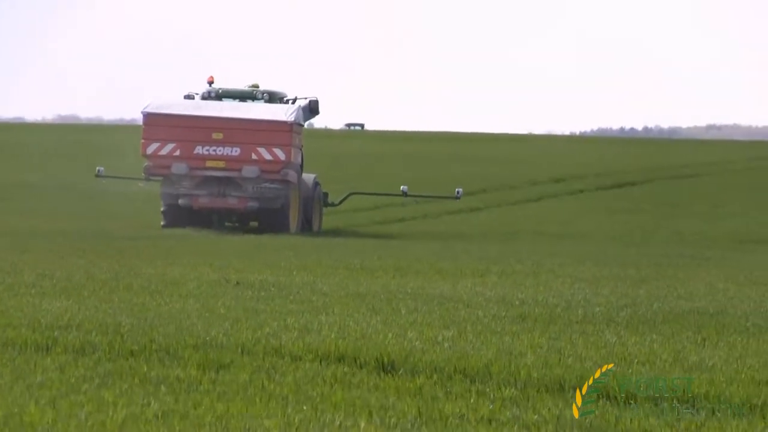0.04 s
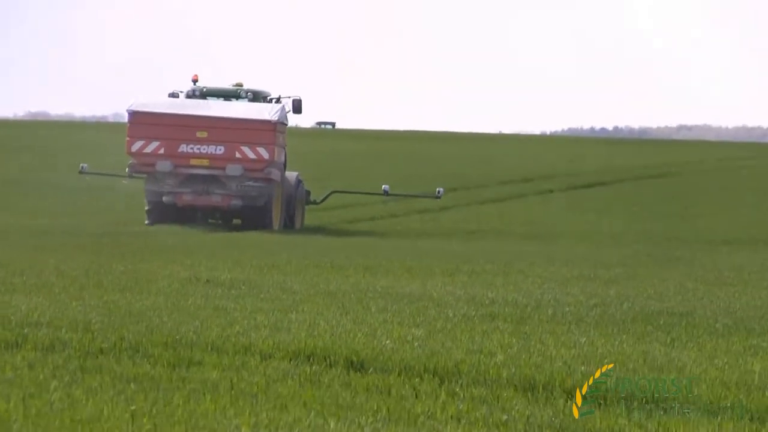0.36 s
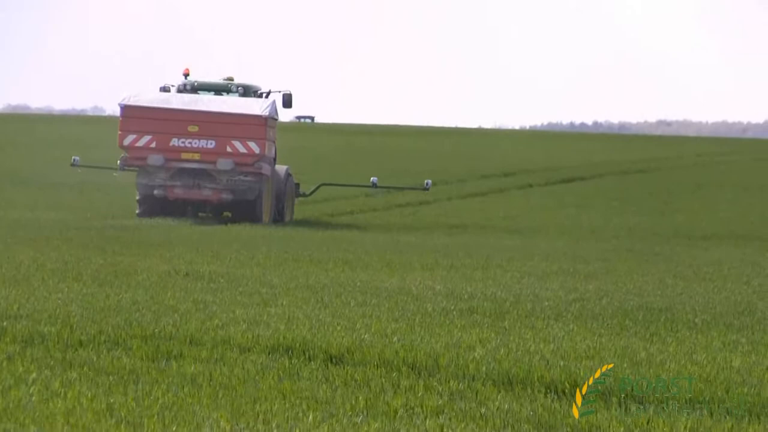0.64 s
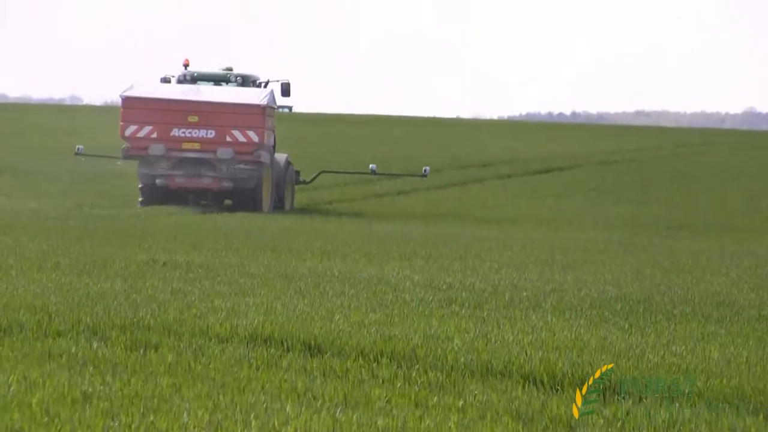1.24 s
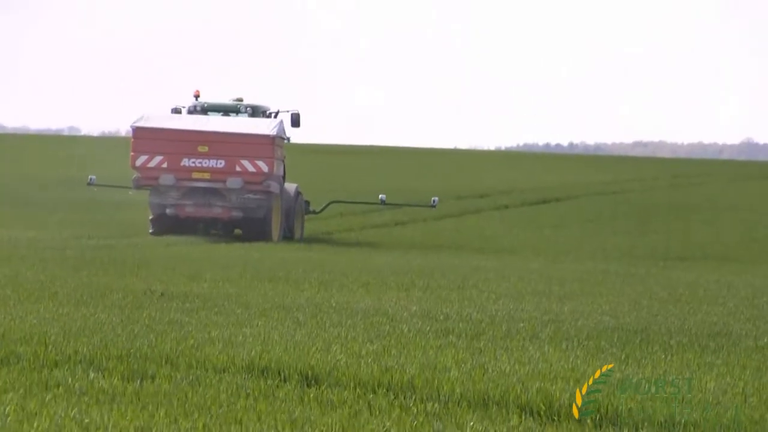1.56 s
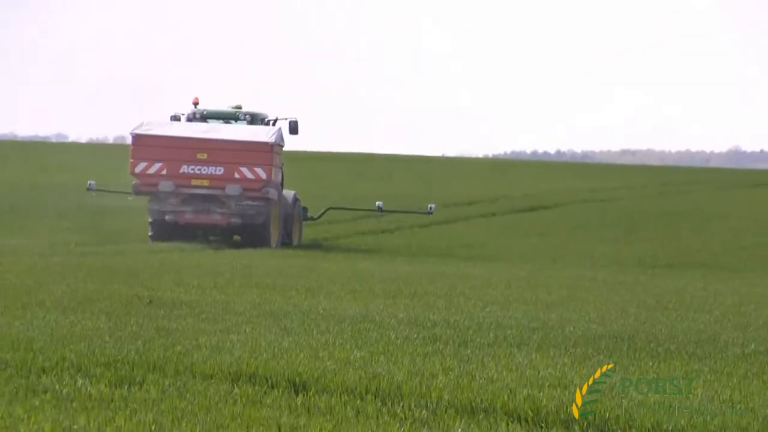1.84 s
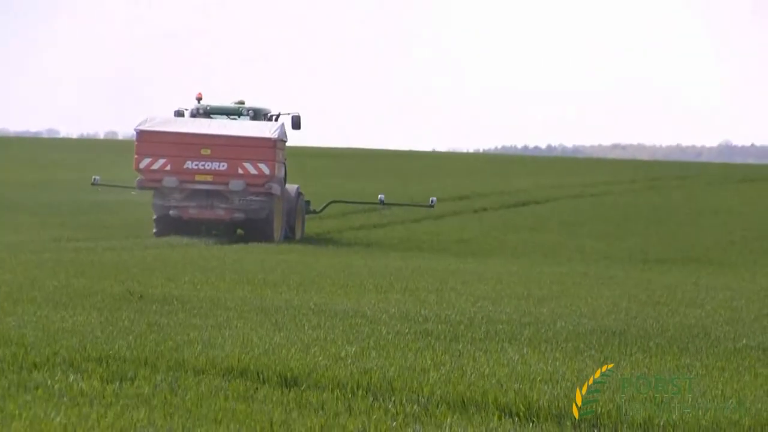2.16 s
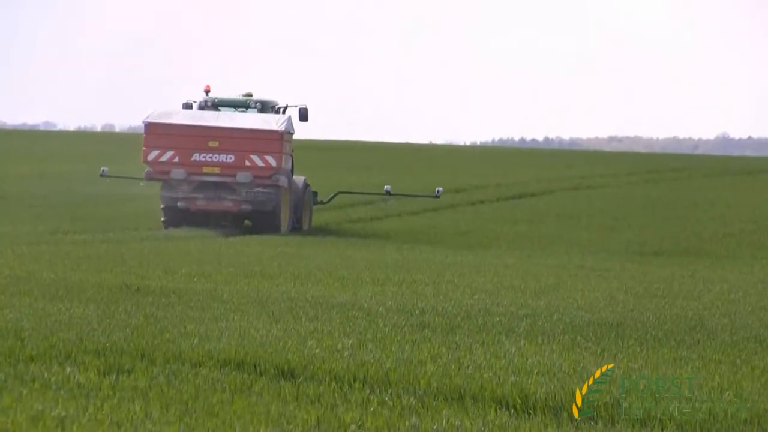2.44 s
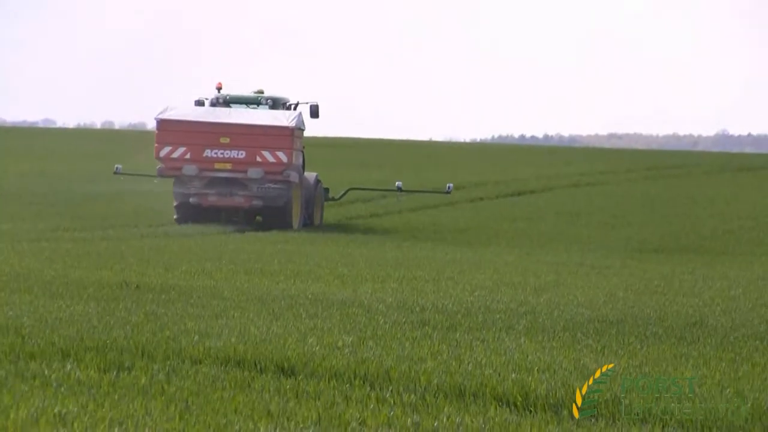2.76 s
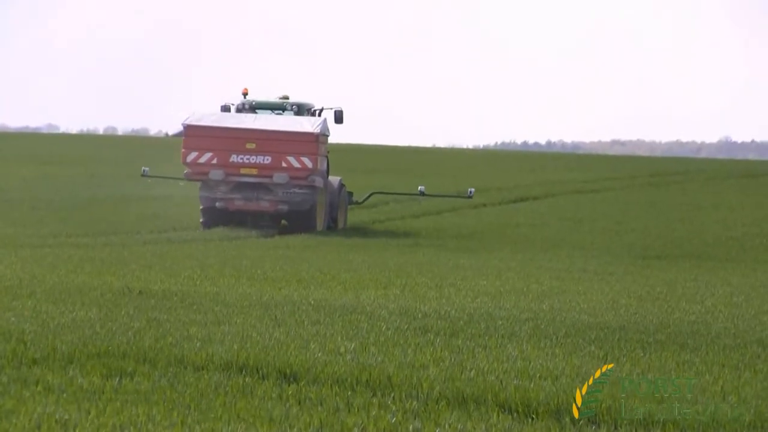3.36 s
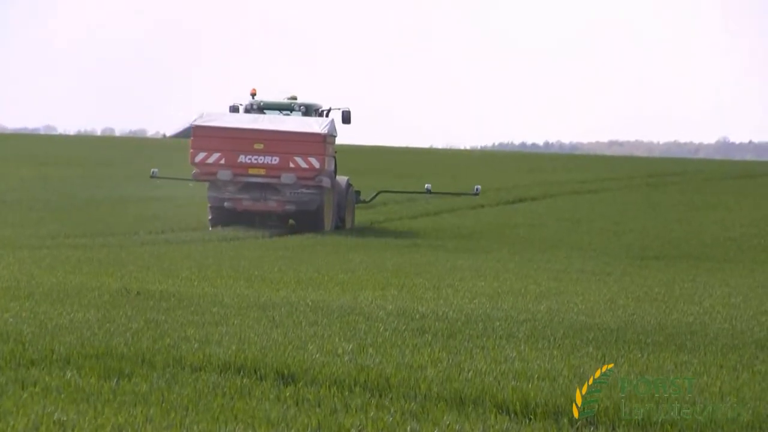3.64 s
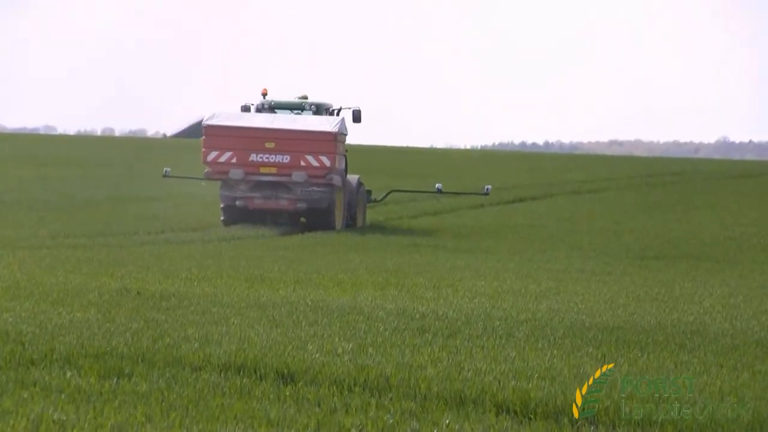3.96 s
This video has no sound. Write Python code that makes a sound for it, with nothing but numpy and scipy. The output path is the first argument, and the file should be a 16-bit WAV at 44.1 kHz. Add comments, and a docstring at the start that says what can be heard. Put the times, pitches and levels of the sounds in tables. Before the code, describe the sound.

Steady drone of a faraway tractor pulling a fertilizer spreader, with gusts rumbling on the microphone.

```python
"""A distant six-cylinder tractor pulls a fertilizer spreader: firing hum, rasp-edged machinery roar and
thin gear whine, with spreader and crop hissing above and wind rumbling on the microphone. The roar
swells at 0.8 s; a run of buffets follows at 1.1-1.7 s. A dip rises through the roar, deepest at 2.4 s.
The whine peaks at 3 s, the roar swells again, and a second run of buffets starts at 3.7 s.
Throughout, moving air shifts the roar's colour and the hum fades as the tractor draws away."""
import sys
import numpy as np
from scipy import signal
from scipy.fft import rfft, irfft
from scipy.io import wavfile
from scipy.ndimage import uniform_filter1d, map_coordinates

SR = 44100
rng = np.random.default_rng(int(sys.argv[2]) if len(sys.argv) > 2 else 0)


def digitize_waveform(pressure):
    """Quantize a signal to 16-bit integers and store it at the path in sys.argv[1].

    Rows of a 2-D input are taken as channels; values are limited to [-1, 1].
    """
    field = np.atleast_2d(pressure).T
    bounded = np.clip(field, -1, 1)
    quanta = np.round(bounded * 32767).astype(np.int16)
    wavfile.write(sys.argv[1], SR, quanta)


N = 176400


def undb(db):
    """Decibels to gain."""
    return 10 ** (np.asarray(db) / 20)


def unit(x):
    """Scale to rms 1."""
    return x / np.std(x)


def noise():
    """White noise."""
    return rng.standard_normal(N)


def bins_hz():
    """FFT bin frequencies, floored at 1 Hz."""
    return np.maximum(np.arange(N // 2 + 1) * SR / N, 1)


def curve(rows, column=1):
    """Table column, linearly interpolated in time."""
    rows = np.array(rows)
    return np.interp(np.arange(N) / SR, rows[:, 0], rows[:, column])


def walk(rate_hz):
    """Smooth random drift, spread near 1."""
    hold = max(int(SR / rate_hz), 2)
    steps = np.repeat(rng.standard_normal(N // hold + 1), hold)
    return 1.3 * uniform_filter1d(uniform_filter1d(steps, hold), hold)[:N]


def phase_rad(hz):
    """Phase of a moving frequency, random start."""
    return 2 * np.pi * (np.cumsum(hz) / SR + rng.random())


def narrowband(phase, width_hz):
    """Noise band about a moving tone, rms near 1."""
    return walk(width_hz) * np.sin(phase) + walk(width_hz) * np.cos(phase)


def coloured_noise(colour):
    """Noise shaped by (f/Hz, gain/dB) rows, rolled off beyond their ends; rms 1."""
    hz, db = np.array(colour).T
    f = bins_hz()
    skirts = np.minimum(f / hz[0], 1) ** 2 * np.minimum(hz[-1] / f, 1) ** 2
    gain = undb(np.interp(np.log(f), np.log(hz), db))
    return unit(irfft(rfft(noise()) * gain * skirts, N))


def flicker(x, lo_hz, hi_hz, depth_db, rate_hz, bands, tilt_db_per_oct=0):
    """Overlapping bands waver independently and tilt about the middle."""
    octave, spectrum, out = np.log2(bins_hz()), rfft(x), 0
    centres = np.linspace(np.log2(lo_hz), np.log2(hi_hz), bands)
    for centre, weights in zip(centres, np.eye(bands)):
        band = irfft(spectrum * np.interp(octave, centres, weights), N)
        out += band * undb(depth_db * walk(rate_hz) + tilt_db_per_oct * (centre - centres.mean()))
    return out


def breezy_noise(colour, levels, trim_db=0):
    """Enveloped noise whose bands waver in the breeze."""
    wavering = flicker(coloured_noise(colour), 1500, 6900, depth_db=0.9, rate_hz=7.05, bands=7)
    return wavering * undb(curve(levels) + trim_db)


def stereo(mid, side, width):
    """Mid/side to left/right."""
    return mid + width * side * np.array([[1], [-1]])


def mic_ports(x, lag_s):
    """A slow pressure wave meets one microphone port lag_s before the other."""
    return stereo(x, np.gradient(x) * SR, lag_s / 2)


# Background spectra, mid and side: f/Hz, gain/dB
AIR_MID_COLOUR = [(1500, -7), (3000, 5.5), (6000, 0), (9000, -0.5), (12000, -2.5), (15500, -6)]
AIR_SIDE_COLOUR = [(2000, -36), (2700, -22), (3200, 0), (5200, 0.5), (7500, -1.5), (9500, -0.5),
                   (12000, -3.5), (15500, -8)]
def air(mid_db=-63, side_db=-59.5):
    """Even, wide background hiss."""
    mid = undb(mid_db) * coloured_noise(AIR_MID_COLOUR)
    return stereo(mid, coloured_noise(AIR_SIDE_COLOUR), undb(side_db))


# Rumble envelope: t/s, level/dB
WIND_LEVEL = [(0, -41.5), (.55, -42.5), (.65, -33.5), (.75, -39), (.87, -38.5), (1.05, -42), (1.25, -36),
              (1.45, -36), (1.6, -32), (1.7, -38), (1.83, -37.5), (1.97, -40.5), (2.55, -40), (2.7, -48),
              (3.2, -41.5), (3.6, -44), (3.78, -33), (3.9, -31.5), (4, -28)]
# Rumble spectrum: f/Hz, gain/dB
WIND_COLOUR = [(10, -20), (25, -4), (55, 0), (100, -4.5), (150, -7), (220, -15.5), (320, -21), (600, -27),
               (1200, -67)]
def wind():
    """Turbulence on the microphone, brighter when stronger."""
    level_db = curve(WIND_LEVEL)
    tilt = 0.12 * (level_db - level_db.mean())
    rumble = coloured_noise(WIND_COLOUR)
    rumble = flicker(rumble, 38.6, 323, depth_db=3.5, rate_hz=24.88, bands=4, tilt_db_per_oct=tilt)
    return rumble * undb(level_db)


# Eddies: t/s, level/dB, f/Hz, decay/s
BUFFETS = [(0.642, -22.5, 76.4, 0.014), (0.661, -25, 170, 0.0065), (1.141, -28, 140, 0.0044),
           (1.281, -19.5, 140.3, 0.0031), (1.33, -27, 290, .004), (1.346, -23.5, 149, 0.0061),
           (1.37, -29, 450, 0.0035), (1.373, -18, 100, 0.0036), (1.441, -27.5, 170.4, 0.0052),
           (1.521, -17.5, 100, 0.0076), (1.533, -16.5, 120.5, 0.005), (1.537, -16.5, 363, 0.0036),
           (1.57, -16, 100, 0.004), (1.583, -18, 214.7, 0.005), (1.614, -19.5, 114.7, 0.0064),
           (1.648, -19.5, 64.9, 0.0079), (2.825, -31.5, 163, 0.0094), (3.326, -30.5, 230.4, 0.0057),
           (3.752, -13, 70, 0.0077), (3.748, -19.5, 230, 0.0073), (3.864, -9.5, 205, 0.006),
           (3.873, -19.5, 390, 0.0043), (3.887, -17.5, 220.5, 0.0056), (3.906, -12, 105, 0.005),
           (3.944, -25, 238.2, 0.0043), (3.951, -17, 190, 0.0027), (3.964, -15, 145.3, 0.004),
           (3.96, -21.5, 370, 0.0034)]
def buffets(rise_speedup=1.38, steepening=0.097):
    """Each eddy shoves the diaphragm through one or two steep, ragged swings."""
    t, out = np.arange(N) / SR, np.zeros(N)
    ragged_rad_per_hz = phase_rad(np.exp(0.17 * walk(500)))
    grit = 1 + 0.18 * walk(400)
    for (at_s, db, hz, decay_s), start in zip(BUFFETS, rng.random(len(BUFFETS))):
        near = np.abs(t - at_s) < 10 * decay_s
        phase = hz * ragged_rad_per_hz[near] + 2 * np.pi * start
        age = (t[near] - at_s) / decay_s
        envelope = undb(db) / np.cosh(np.pi / 2 * np.minimum(age, rise_speedup * age))
        out[near] += envelope * (np.sin(phase) + steepening * np.sin(2 * phase))
    return out * grit


# Hiss layer envelopes, before trim: t/s, level/dB
TREBLE_LEVEL = [(.03, -53), (.35, -52.5), (.5, -51.5), (.7, -54), (.95, -52.7), (1.3, -54), (1.8, -54),
                (2.2, -55), (2.38, -54), (2.6, -55), (3, -53), (3.23, -52.7), (3.42, -54.5), (3.66, -58),
                (3.97, -55)]
HISS_LEVEL = [(.03, -58), (.27, -56), (.58, -57.5), (.8, -61), (1.4, -60.5), (2, -61.5), (2.25, -60.5),
              (2.85, -61.5), (3.15, -56), (3.46, -64), (3.8, -59.5), (3.97, -58.5)]
SIZZLE_LEVEL = [(0, -62), (.24, -59.5), (.42, -64), (.8, -64), (1, -62), (1.3, -69.5), (1.8, -63.5),
                (2.1, -69), (2.7, -64), (2.9, -68.5), (3.14, -63.5), (3.44, -69), (3.79, -61), (3.93, -70)]
# Hiss layer spectra: f/Hz, gain/dB
TREBLE_COLOUR = [(1300, -5), (1850, -7.5), (2350, -3), (2800, 1.8), (3400, -0.4), (3750, -3), (4200, -14),
                 (6000, -22.5)]
HISS_COLOUR = [(3000, -21), (4000, 3), (4800, 4), (5300, 6), (5750, -5), (7200, -9.5), (9000, -14.5),
               (15000, -23)]
SIZZLE_COLOUR = [(4500, -25), (5750, -2), (6500, 0), (7200, -6), (9000, -13.5), (15000, -25)]
def spreader_hiss():
    """Spreader and crop hiss in three layers, low to high."""
    return (breezy_noise(TREBLE_COLOUR, TREBLE_LEVEL, trim_db=-0.03)
            + breezy_noise(HISS_COLOUR, HISS_LEVEL, trim_db=-0.3)
            + breezy_noise(SIZZLE_COLOUR, SIZZLE_LEVEL))


# Resonance track: t/s, level/dB, f/Hz
RUSH_TRACK = [(0, -65, 3400), (.52, -57.5, 3650), (.72, -60, 3297), (1.22, -55.5, 3300), (1.6, -59.5, 3250),
              (1.8, -56.5, 3400), (2.1, -65, 3110), (3, -67, 3400), (3.24, -54.5, 3620), (3.6, -68, 3595),
              (3.85, -61, 3396), (3.97, -55.5, 3320)]
def spreader_rush():
    """A narrow resonance in the hiss wanders, swells and fades."""
    phase = phase_rad(curve(RUSH_TRACK, column=2))
    return unit(narrowband(phase, width_hz=1000)) * undb(curve(RUSH_TRACK))


# Rasp envelope, before trim: t/s, level/dB
RASP_LEVEL = [(0, -58), (.3, -48.5), (.48, -56), (1.3, -54), (1.65, -60.5), (2.2, -58), (2.6, -57.5),
              (3, -50.5), (3.3, -55.5), (3.65, -58), (3.84, -53), (4, -51)]
# Rasp spectrum: f/Hz, gain/dB
RASP_COLOUR = [(1200, -8), (1550, -7.5), (1830, -0.5), (2100, -4.5), (2400, -10), (3000, -17)]
def machinery_rasp():
    """Raspy upper edge of the machinery roar."""
    return breezy_noise(RASP_COLOUR, RASP_LEVEL, trim_db=-1.5)


# Faint drive and gear tones: f/Hz, level/dB
DRIVE_TONES = [(85.5, -50.5), (649, -61.5), (1145, -61)]
# Main whine envelope: t/s, level/dB
WHINE_LEVEL = [(0, -53), (.85, -47.5), (1.4, -53.5), (2.1, -58), (2.7, -49.5), (2.96, -40.5), (3.25, -45),
               (3.58, -44), (3.72, -43), (4, -47)]
def gears(whine_hz=893.5, wobble=0.0026):
    """Thin drive and gear tones waver in the moving air."""
    def tone(hz):
        return unit(np.sin(phase_rad(hz * (1 + wobble * walk(14)))))
    faint = sum(tone(hz) * undb(db + 1.8 * walk(6.07)) for hz, db in DRIVE_TONES)
    return faint + tone(whine_hz) * undb(curve(WHINE_LEVEL) + 2 * walk(9.1))


# Exhaust partials: multiple of firing rate, gain/dB
EXHAUST_PARTIALS = [(1, -3.5), (2, -31), (3, -37)]
def exhaust(firing_rad, start_db=-41.5, fade_db_per_s=1.4, waver_db=1.4, roughness=0.53):
    """Firing hum: only the lowest partials carry over the field; uneven firings roughen it."""
    level_db = start_db - fade_db_per_s * np.arange(N) / SR + waver_db * walk(10.8)
    hum = unit(sum(undb(db) * np.sin(k * firing_rad) for k, db in EXHAUST_PARTIALS))
    return (hum + roughness * narrowband(firing_rad, width_hz=110.8)) * undb(level_db)


# Dip, likely ground-reflection cancellation: t/s, f/Hz, depth/dB
GROUND_DIP = [(1.3, 650, 2.5), (1.9, 915, 3.5), (2.4, 1100, 10.5), (2.8, 1228, 2.5), (3.3, 1400, .3)]
def field_path(x, colour, pitch_ratio, flicker_db=0.26, dip_log_width=0.12, bands=34):
    """Path over the field: the colour slides by pitch_ratio and a dip rises through it; rms near 1."""
    hz, db = np.array(colour).T
    log_f, log_shift = np.log(bins_hz()), np.log(pitch_ratio)
    log_dip, depth_db = np.log(curve(GROUND_DIP)), curve(GROUND_DIP, column=2)
    centres = np.linspace(np.log(hz[0] / 2), np.log(hz[-1] * 2), bands)
    spectrum, out, power = rfft(x), 0, 0
    for centre, weights in zip(centres[1:-1], np.eye(bands)[1:-1]):
        band = irfft(spectrum * np.interp(log_f, centres, weights), N)
        dip_db = depth_db * np.exp(-((centre - log_dip) / dip_log_width) ** 2)
        gain = undb(np.interp(centre - log_shift, np.log(hz), db) - dip_db)
        out += band * gain * undb(flicker_db * walk(8.7))
        power += np.var(band) * gain ** 2
    return out / np.sqrt(1.5 * power)


FIRING_HZ, CYLINDERS = 123.56, 6
# Roar track, before trim: t/s, level/dB, f/Hz
ROAR_TRACK = [(0, -38.5, 1036), (.4, -38, 1010), (.8, -36, 1010), (1.3, -37.5, 1066), (1.75, -39.5, 1010),
              (2.1, -42, 999), (2.37, -41, 980), (2.7, -38, 960), (3.0, -37.5, 953), (3.3, -35.5, 977),
              (3.62, -35.5, 1030), (4, -37, 1000)]
# Roar spectrum when centred on reference_hz: f/Hz, gain/dB
ROAR_COLOUR = [(250, -26.5), (450, -22), (630, -8.5), (740, -7), (900, -1.5), (1000, -1), (1130, -1),
               (1270, -3.5), (1400, -9.5), (1570, -18.5), (1800, -19.5), (2300, -36.5)]
def machinery(firing_rad, clatter_share=0.098, throb_hz=31.15, reference_hz=1029.6, trim_db=0.5):
    """Roar: rushing noise plus clatter repeating each engine cycle, throbbing with the firings."""
    cycle_samples = int(SR * CYLINDERS / FIRING_HZ)
    position = firing_rad / (2 * np.pi * CYLINDERS) % 1 * cycle_samples
    clatter = unit(map_coordinates(noise()[:cycle_samples], [position], mode="wrap"))
    throb_rad = phase_rad(throb_hz * (1 + 0.0051 * walk(3.3)))
    throb = 1 + 0.074 * np.sin(firing_rad) + 0.081 * np.sin(throb_rad)
    roar = (np.sqrt(clatter_share) * clatter + np.sqrt(1 - clatter_share) * noise()) * throb
    pitch_ratio = curve(ROAR_TRACK, column=2) / reference_hz
    return field_path(roar, ROAR_COLOUR, pitch_ratio) * undb(curve(ROAR_TRACK) + trim_db)


def scene():
    """Tractor and spreader centred, background hiss wide, wind from changing sides."""
    firing_rad = phase_rad(FIRING_HZ * (1 + 0.003015 * walk(3)))
    tractor = exhaust(firing_rad) + gears() + machinery(firing_rad) + machinery_rasp()
    spreader = spreader_hiss() + spreader_rush()
    background = air()
    direction = walk(120)
    rumble = mic_ports(wind(), lag_s=30e-6 * direction)
    eddies = mic_ports(buffets(), lag_s=150e-6 * direction)
    return background + rumble + eddies + spreader + tractor


def record(dry, cutoff_hz=15700):
    """Steep recorder low-pass."""
    return signal.sosfilt(signal.ellip(10, .1, 80, cutoff_hz, fs=SR, output="sos"), dry)


dry = scene()
out = record(dry)
digitize_waveform(out)
```